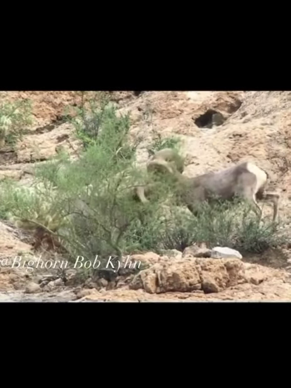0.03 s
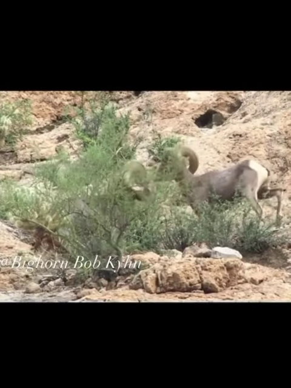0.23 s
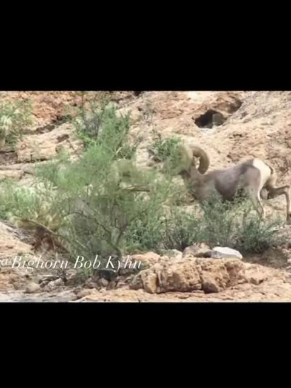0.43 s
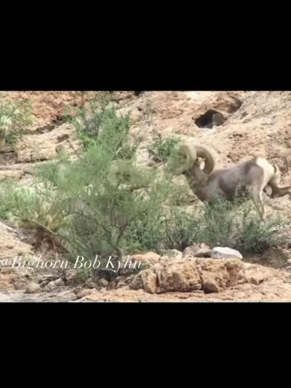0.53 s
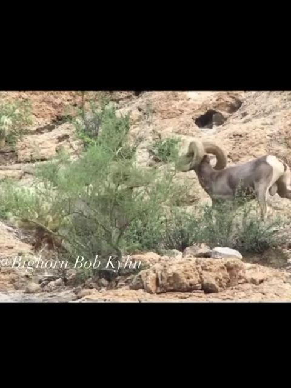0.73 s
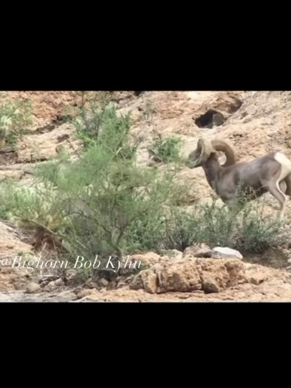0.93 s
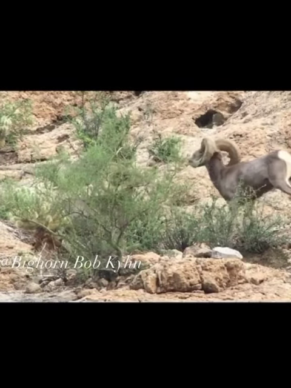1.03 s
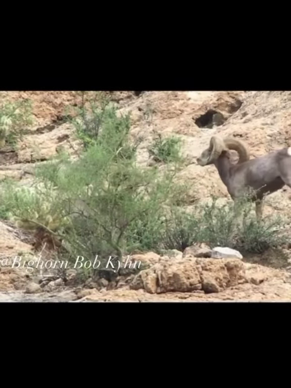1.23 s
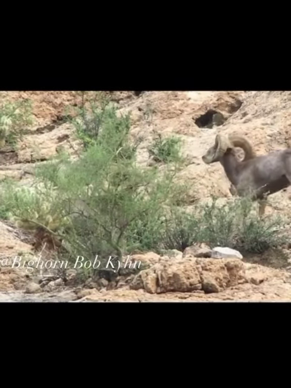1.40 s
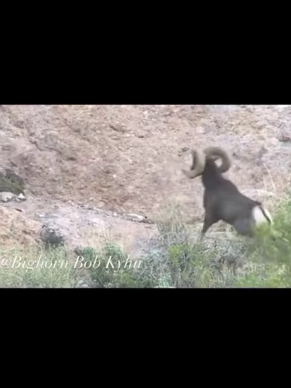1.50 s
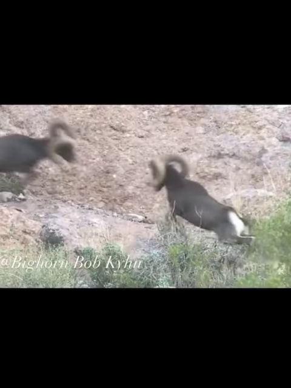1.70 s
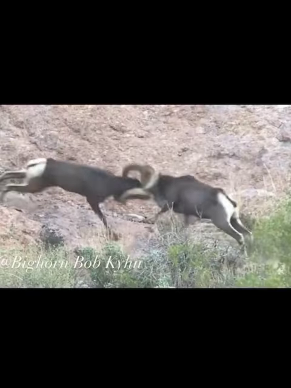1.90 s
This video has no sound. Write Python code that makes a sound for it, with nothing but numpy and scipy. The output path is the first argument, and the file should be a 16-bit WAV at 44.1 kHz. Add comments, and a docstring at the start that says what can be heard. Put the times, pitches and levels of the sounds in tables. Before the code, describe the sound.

A single hollow knock with a faint crack sounds as two distant rams butt heads in a canyon. Its echo fades over soft wind and light scuffs on stone, before a sudden change to a faint, faraway engine throb.

```python
"""A rocky slope, the microphone far from two bighorn rams. Low wind and light scuffs on stone come first.
The rams butt heads once: a hollow knock of horn and skull with a faint crack. Nearby rocks throw it
back, and the canyon rolls on with it into a soft, steady rush over the wind. Near the end the ambience
switches abruptly, with a soft tick, to a quieter spot where a distant engine throbs."""
import sys
import numpy as np
from scipy import signal
from scipy.fft import rfft, irfft
from scipy.io import wavfile

SR = 44100
rng = np.random.default_rng(int(sys.argv[2]) if len(sys.argv) > 2 else 0)


def master_out(mix):
    """Clip the mix to full scale and print it as 16-bit PCM to the path in sys.argv[1]."""
    frames = np.transpose(np.atleast_2d(mix))
    ceiling = np.clip(frames, -1, 1)
    pcm = np.round(ceiling * 32767).astype(np.int16)
    wavfile.write(sys.argv[1], SR, pcm)


N = 85995
CLASH_S, SWITCH_S = .2264, 1.612  # the knock reaches the microphone; the quieter spot begins


def undb(db):
    """Decibels to gain."""
    return 10 ** (np.asarray(db) / 20)


def unit(x):
    """Scale to rms 1."""
    return x / np.sqrt(np.mean(x ** 2))


def since(start):
    """Seconds since start, zero before it."""
    return np.maximum(np.arange(N) / SR - start, 0)


def fade(age, t60):
    """Falls 60 dB in t60 seconds."""
    return np.exp(-np.log(1000) * age / t60)


def bell(x, centre, width):
    """Gaussian of height 1; width is its standard deviation."""
    return np.exp(-.5 * ((x - centre) / width) ** 2)


def curve(points):
    """Gain along (s, dB) points."""
    return undb(np.interp(since(0), *np.array(points).T))


def colour(x, points):
    """Causal filter through (Hz, dB) points."""
    hz, db = np.array(points).T
    freqs = np.maximum(np.fft.rfftfreq(2 * N, 1 / SR), 1)
    gain = undb(np.interp(np.log(freqs), np.log(hz), db))
    cepstrum = irfft(np.log(gain))
    cepstrum[1:N] *= 2
    cepstrum[N + 1:] = 0
    return irfft(rfft(x, 2 * N) * np.exp(rfft(cepstrum)))[:N]


def noise(points):
    """Noise of rms 1 with the given spectrum."""
    return unit(colour(rng.standard_normal(N), points))


def band_noise(hz, width_hz):
    """A bell-shaped band of noise of rms 1."""
    band = bell(np.fft.rfftfreq(N, 1 / SR), hz, width_hz)
    return unit(irfft(rfft(rng.standard_normal(N)) * band, N))


def lowpass(x, hz, order=4):
    """Butterworth low-pass."""
    return signal.sosfilt(signal.butter(order, hz, fs=SR, output="sos"), x)


def highpass(x, hz):
    """Second-order high-pass."""
    return signal.sosfilt(signal.butter(2, hz, "high", fs=SR, output="sos"), x)


def push(start, length):
    """A smooth force pulse of area 1."""
    force = np.exp(-np.pi * ((since(0) - start - length / 2) / (length / 2)) ** 2)
    return force / force.sum()


def ring(modes, t):
    """Damped modes, t seconds after a blow."""
    return sum(undb(db) * np.cos(2 * np.pi * hz * t) * fade(t, t60) for hz, db, t60 in modes)


# Spectrum of the hiss. Each row: frequency in Hz, relative level in dB.
HISS_SPECTRUM = [(40, 5), (170, 20.5), (400, 9), (1000, 0.5), (2000, 0), (3000, -2), (5000, -4.5),
                 (6700, -3.5), (7500, -5.5), (12900, -9), (13300, -16), (15500, -18)]

def hiss():
    """A faint, even noise floor in both places."""
    return undb(-75.5) * noise(HISS_SPECTRUM)


# Spectrum of the still air. Each row: frequency in Hz, relative level in dB.
STILL_AIR_SPECTRUM = [(30, -27), (160, 5.5), (250, -2), (450, -4), (700, -10), (900, -15), (1600, -29.5),
                      (3000, -43), (15000, -50)]

def still_air():
    """A low hush around the microphone at the quieter spot."""
    return undb(-72.5) * noise(STILL_AIR_SPECTRUM)


def whine():
    """A thin, high whine at the quieter spot, perhaps insects."""
    return undb(-90) * band_noise(hz=9900, width_hz=420)


# Spectrum of one engine pulse. Each row: frequency in Hz, relative level in dB.
ENGINE_SPECTRUM = [(20, -32), (47, -8.5), (70, 8), (94, 6), (117, -7), (140, -5.5), (165, -3), (200, -23.5),
                   (400, -47.5), (2000, -89)]

def engine(pulse_hz=23.4, jitter_s=.0011, scatter_db=2.3):
    """Slightly uneven pulses from far away; only the bass carries to the microphone."""
    starts = np.arange(SWITCH_S, N / SR, 1 / pulse_hz)
    late, strong = rng.standard_normal((len(starts), 2)).T
    samples = np.minimum((starts + jitter_s * late) * SR, N - 1).astype(int)
    pulses = np.zeros(N)
    pulses[samples] = undb(scatter_db * strong)
    throb = colour(pulses, ENGINE_SPECTRUM)
    return undb(-61) * throb / np.std(throb[int(SWITCH_S * SR):])


# Spectra of the air on the slope. Each row: frequency in Hz, relative level in dB.
RUSH_SPECTRUM = [(100, -11), (178, -13), (251, -9), (372, -7), (520, -14.5), (610, -5), (745, 2),
                 (850, -5.5), (960, -17), (1150, -23.5), (1400, -34.5), (2500, -38), (6000, -59)]
BREEZE_SPECTRUM = [(40, -13.5), (120, 3), (210, 0), (330, 0), (500, -10), (900, -7), (1500, -21.5),
                   (2500, -28.5), (6000, -40.5)]
WIND_SPECTRUM = [(18, -26), (40, -1.5), (62, 6), (85, 1.5), (110, -23.5), (200, -25), (500, -59),
                 (2000, -72)]
# How rush and wind rise and fall. Each row: time in seconds, level in dB.
RUSH_SWELL = [(0, -80), (.22, -71), (.7, -57.5), (1.0, -63), (1.25, -60.5), (1.6, -61)]
WIND_GUSTS = [(0, -71), (.2, -72), (.55, -59), (.8, -69), (.96, -65.5), (1.04, -59), (1.12, -73),
              (1.36, -70), (1.43, -58.5), (1.49, -70.5), (1.6, -65)]

def slope_air():
    """A hollow rush in the distance and a soft breeze over low gusts of wind."""
    rush = noise(RUSH_SPECTRUM) * curve(RUSH_SWELL)
    breeze = undb(-71) * noise(BREEZE_SPECTRUM)
    wind = noise(WIND_SPECTRUM) * curve(WIND_GUSTS)
    return rush + breeze + wind


# Scuffs and thuds. Each row: peak time in seconds, frequency in Hz, level in dB, width in seconds.
HOOF_SCUFFS = [(0.112, 960, -72.5, 0.022), (.14, 1350, -75.5, 0.014), (.565, 1400, -61, 0.0035),
               (0.58, 836, -54, 0.024), (0.732, 1080, -69.5, 0.0078), (1.12, 262, -62, 0.024),
               (1.18, 394, -65, 0.039), (1.237, 885, -59, 0.0053), (1.479, 2300, -81, 0.0046),
               (1.58, 1025, -65, 0.013), (1.585, 1350, -71.5, 0.0031)]

def hooves(width_share=.095):
    """Short, dull scuffs out on the slope, likely hooves on loose stone."""
    return sum(undb(db) * band_noise(hz, hz * width_share) * bell(since(0), peak_s, width_s)
               for peak_s, hz, db, width_s in HOOF_SCUFFS)


# Spectrum of the canyon's roll. Each row: frequency in Hz, relative level in dB.
ROLL_SPECTRUM = [(30, -34.5), (55, -16.5), (87, -3.5), (125, -19.5), (175, -18.5), (227, -5.5), (275, -14),
                 (370, -4), (440, -12.5), (520, -20), (610, -6), (735, -4), (860, -7.5), (950, -18),
                 (1060, -22), (1250, -27), (1520, -30), (1800, -44.5), (3000, -49.5), (6000, -91)]

def canyon(delay_s=.016, bass_hz=140, treble_hz=950):
    """Countless reflections in the horns' colour: the bass comes late and stays, the far wall answers."""
    age = since(CLASH_S + delay_s)
    spectrum = rfft(noise(ROLL_SPECTRUM))
    freqs = np.fft.rfftfreq(N, 1 / SR)
    # Each row: band, rise in seconds, time to fall 60 dB in seconds.
    bands = [(freqs < bass_hz, .013, 1.7),
             ((freqs >= bass_hz) & (freqs < treble_hz), .0088, 1.25),
             (freqs >= treble_hz, .0088, .97)]
    roll = sum(irfft(spectrum * band, N) * (1 - np.exp(-age / rise)) * fade(age, t60)
               for band, rise, t60 in bands)
    far_wall = noise(ROLL_SPECTRUM) * bell(since(0), centre=.582, width=.072)
    return undb(-41.5) * roll + undb(-50.5) * far_wall


# Echoes off rock faces. Each row: arrival at the microphone in seconds, relative level in dB.
ROCK_ECHOES = [(.262, -9), (.2845, -14.5), (.3015, -15.5), (.3195, -13.5), (.3415, -14.5), (.3495, -15),
               (.38, -18.5), (.412, -21.5), (.4545, -25.5), (.4805, -21), (.508, -26), (.568, -24.5),
               (.601, -25), (.675, -52), (.727, -34), (.741, -28), (.756, -28), (.843, -28)]

def rocks(knock, scatter_s=.005, scatter_db=-12):
    """The knock arrives directly, then off each rock face, thinner, duller, scattered by rough stone."""
    paths = np.zeros(N)
    for start, db in ROCK_ECHOES:
        age = since(start)
        scatter = rng.standard_normal(N) * (age > 0) * np.exp(-age / scatter_s)
        paths += undb(db + scatter_db) * scatter / np.linalg.norm(scatter)
        paths[int(start * SR)] += undb(db)
    paths = highpass(lowpass(paths, hz=1177), hz=450)
    paths[int(CLASH_S * SR)] += 1  # straight line to the microphone
    return signal.fftconvolve(knock, paths)[:N]


# Spectrum of the crack. Each row: frequency in Hz, relative level in dB.
CRACK_SPECTRUM = [(300, 5), (1500, -1), (2400, -3.5), (3400, -11.5), (4100, -5.5), (4800, -19), (5700, -9),
                  (7100, -13), (7700, -30.5), (15000, -53)]

def crack(lag_s=.002, hold_s=.019):
    """The horn ridges grate for an instant, faint at this distance, and a thin tail follows."""
    age = since(CLASH_S + lag_s)
    grate = fade(np.maximum(age - hold_s, 0), t60=.037)
    tail = undb(-7.5) * fade(age, t60=.83)
    return undb(-59.5) * noise(CRACK_SPECTRUM) * (age > 0) * np.hypot(grate, tail)


# The horns meet in several places. Each row: seconds after the first touch, relative level in dB.
HORN_CONTACTS = [(.0002, -17), (.00195, -1.5), (.00467, -5.5), (.0105, -9)]
# Horn and skull modes. Each row: frequency in Hz, relative level in dB, seconds to fall 60 dB.
HORN_RESONANCES = [(667, -7, .09), (730, 3, .075), (844, -4, .09), (1025, -9, .075), (1153, -18, .06),
                   (1267, -24, .055), (1541, -21, .055)]
SKULL_RESONANCES = [(162, -15, .08), (215, -12, .08), (318, -4, .1), (385, -5, .08)]

def horns(contact_s=.00075, skull_lag_s=.002, skull_rise_s=.003):
    """Each contact rings the damped horns; the blow booms in the skulls. Time 0 is the first touch."""
    force = sum(undb(db) * push(start, contact_s) for start, db in HORN_CONTACTS)
    clack = signal.fftconvolve(force, ring(HORN_RESONANCES, since(0)))[:N]
    age = since(skull_lag_s)
    boom = undb(-2) * ring(SKULL_RESONANCES, age) * (1 - np.exp(-age / skull_rise_s))
    knock = lowpass(clack + boom, hz=1620, order=14)
    return undb(-24) * highpass(knock, hz=90)


def scene(crossfade_s=.0077):
    """The far clash on the slope, then with a soft tick the quieter spot; one channel."""
    slope = rocks(horns()) + crack() + canyon() + hooves() + slope_air()
    floor = hiss()
    quiet_spot = still_air() + engine() + whine()
    age = since(SWITCH_S)
    switched = np.minimum(age / crossfade_s, 1)
    tick = undb(-48) * lowpass((age > 0) * fade(age, t60=.012), hz=8000)
    return (slope * (1 - switched) + quiet_spot * switched + tick + floor)[None]


def record(dry, top_hz=15400):
    """The recorder cuts the top treble steeply."""
    return signal.sosfilt(signal.ellip(8, .2, 70, top_hz, fs=SR, output="sos"), dry)


dry = scene()
out = record(dry)
master_out(out)
```